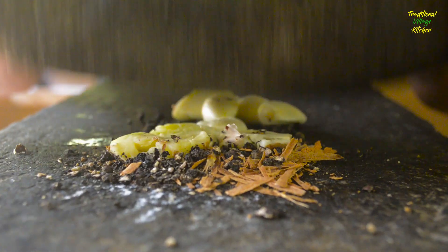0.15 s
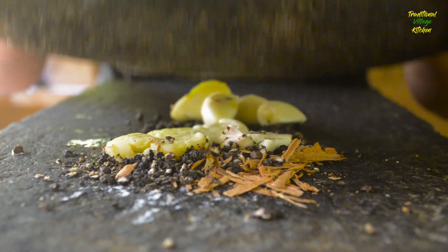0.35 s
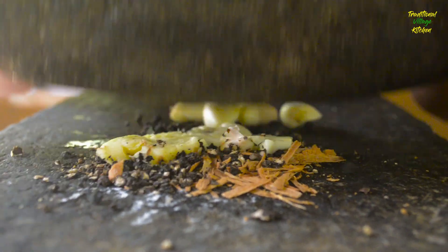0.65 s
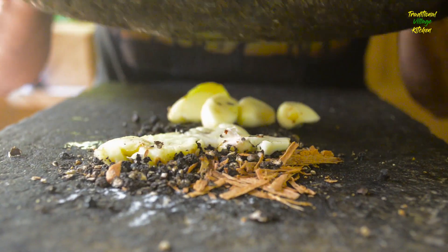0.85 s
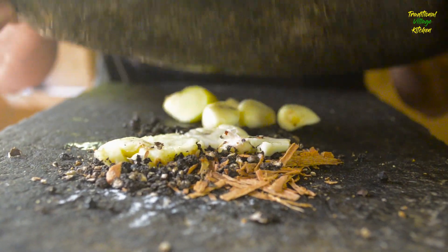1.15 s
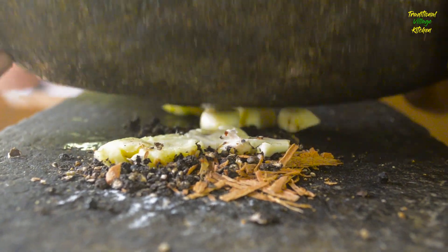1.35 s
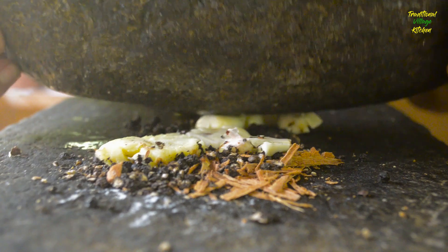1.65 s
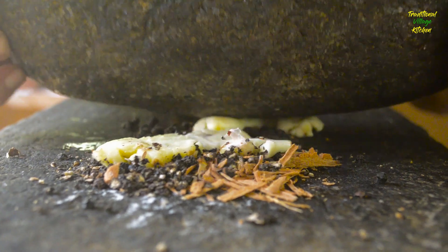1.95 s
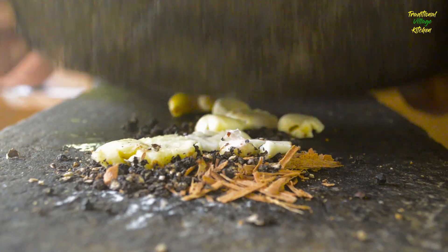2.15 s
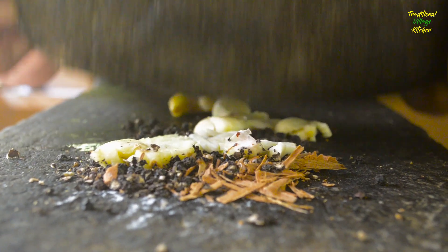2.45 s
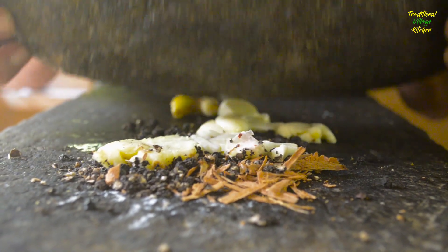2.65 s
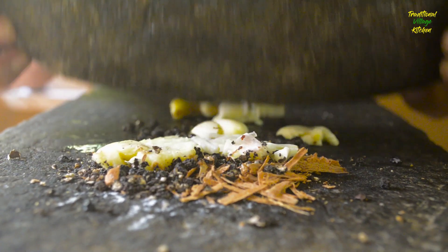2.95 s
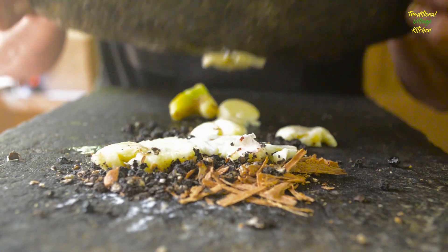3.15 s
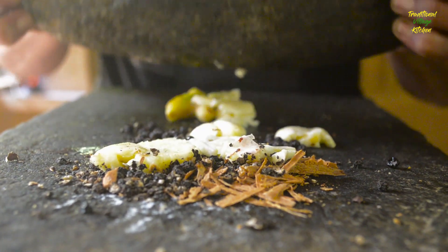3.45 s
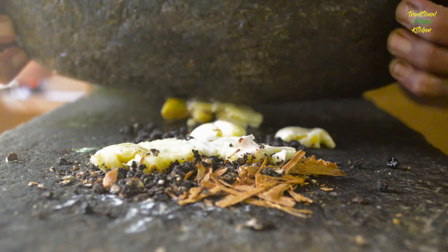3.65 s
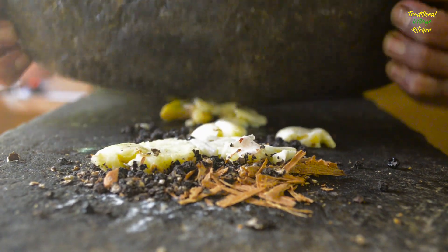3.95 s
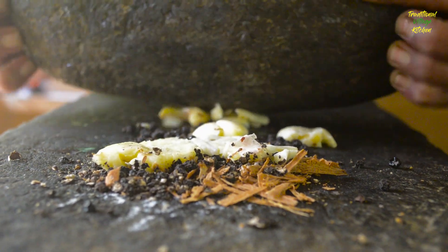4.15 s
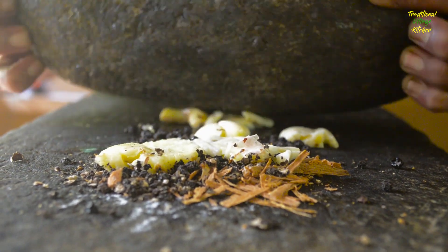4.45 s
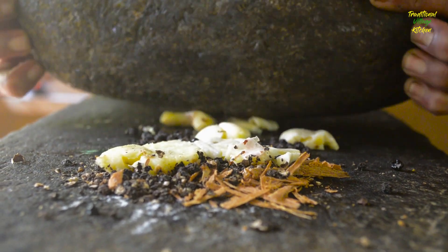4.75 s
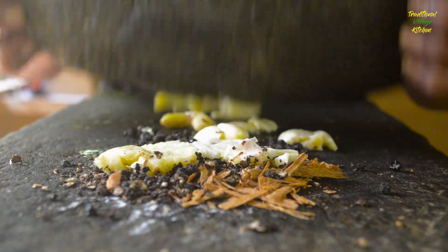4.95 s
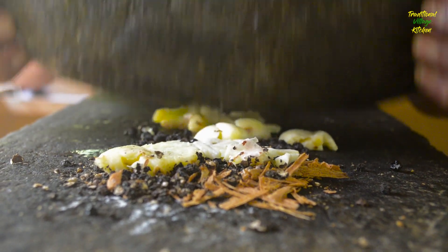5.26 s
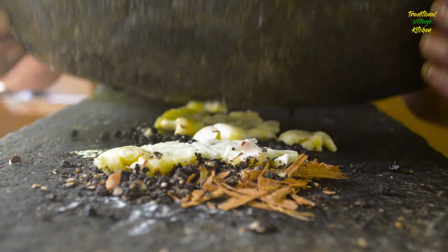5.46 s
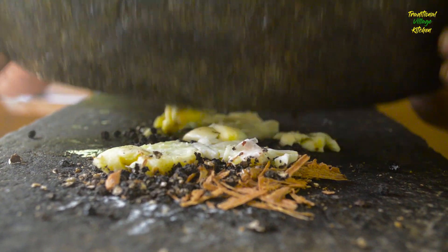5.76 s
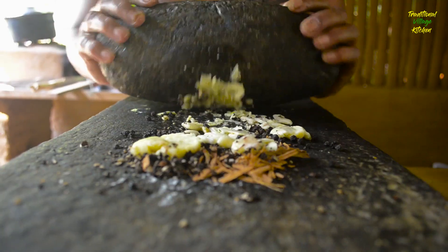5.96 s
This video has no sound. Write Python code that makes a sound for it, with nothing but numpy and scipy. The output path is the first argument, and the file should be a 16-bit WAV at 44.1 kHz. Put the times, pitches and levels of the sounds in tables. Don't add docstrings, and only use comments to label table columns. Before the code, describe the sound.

Very close up, a heavy stone roller pounds garlic and whole spices on a stone slab, roughly three blows a second. Each blow brings a gritty crunch, sharp dry snaps and a low, woody-deep thud from slab and floor, with a short hut echo. Quiet outdoor hush lies behind. Pounding stops shortly before the end, leaving a faint rumble and rustle.

```python
import sys
import numpy as np
from scipy import signal
from scipy.fft import rfft, irfft
from scipy.io import wavfile
from scipy.ndimage import uniform_filter1d

SR = 44100
rng = np.random.default_rng(int(sys.argv[2]) if len(sys.argv) > 2 else 0)


def transcribe(signal):
    frames = np.atleast_2d(signal).T
    limited = np.clip(frames, -1, 1)
    pcm = np.round(limited * 32767).astype(np.int16)
    wavfile.write(sys.argv[1], SR, pcm)


def volts_from_decibels(level):
    exponent = np.asarray(level, float) / 20
    return 10 ** exponent


N = 269010
CUT_S = 5.859
TAP_S = 5.7932

# freq_hz, level_db
HUSH_SPECTRUM = [(60, -42.5), (100, 13), (200, 1), (400, -1), (870, -1), (1760, -5.5), (2400, -9.5),
                 (3200, -14.5), (4200, -21.5), (5400, -25.5), (8000, -28), (11800, -32), (12600, -47.5),
                 (16000, -59)]
# time_s, pitch_hz, level_db
DRONE = [
    (0, 676.5, -63.5),
    (.3, 650, -66),
    (.55, 620, -64),
    (.9, 540, -74),
    (1.2, 498, -76),
]
INSECT_HZ = [7600, 7950, 8150]
# start_s, end_s, pitch_hz, level_db
FAR_TONES = [
    (2.6, 2.8, 1300, -76),
    (2.95, 3.26, 1297, -73),
    (3.07, 3.24, 1940, -68),
    (2.98, 3.2, 2240, -78),
    (.85, 1.0, 1530, -77),
]
# pitch_hz, level_db, t60_s
TAP_MODES = [(1047, -34.5, 0.018), (1824, -31.5, 0.013), (2028, -27.5, 0.012), (2330, -63, .015),
             (3020, -43, 0.012)]
# pitch_hz, level_db, t60_s
TICK_MODES = [(1421, -44, .075), (3284, -56, .04), (2998, -64, .04)]
# freq_hz, level_db
RUMBLE_SPECTRUM = [(18, -38), (30, -21), (59, -1.5), (209, -2.5), (244, -29), (291, -9), (500, -29),
                   (650, -54), (1100, -120)]
# freq_hz, level_db
RUSTLE_SPECTRUM = [(240, -30), (400, -3.5), (1070, -10), (1370, -6), (1800, -11), (2000, -6), (4010, -12.5),
                   (15000, -35)]
# freq_hz, level_db
ECHO_SPECTRUM = [(300, -11), (700, 7.5), (1500, -4), (3000, -4.5), (6000, -5.5), (10000, 4.5), (16000, 1)]
# freq_hz, t60_s
HUT_DECAY = [(600, 0.13), (1600, 0.25), (4000, 0.2), (11000, 0.17)]
# time_s, peak_db, spray_above_8khz_db, fall_s, echo_db
CRUSHES = [(0.2496, -13.5, -36, 0.0058, -7), (0.5772, -8, -27, 0.0043, -8.5),
           (1.034, -25.5, -20, 0.010, -9.5), (1.3573, -23.5, -22, 0.0031, -9.5),
           (1.6737, -14, -28, 0.0036, -7.5), (1.9645, -6, -28.5, 0.003, -9),
           (2.2472, -12.5, -26, 0.0051, -9.5), (2.5427, -14, -37, 0.0038, -8),
           (2.8304, -9, -36, 0.0033, -8.5), (3.282, -22.5, -9, 0.0094, -6.5),
           (3.612, -20, -46, 0.0093, -5.5), (3.9133, -9.5, -18.5, 0.0078, -9.5),
           (4.2058, -11, -21, 0.0035, -10), (4.4832, -7, -21.5, 0.0024, -10),
           (4.765, -11, -18, 0.0075, -9.5), (5.048, -9, -28, 0.0071, -10.5),
           (5.3449, -13.5, -36, 0.0033, -11), (5.6412, -22, -28, 0.0098, -5)]
# freq_hz, level_db
SNAP_SPECTRUM = [(290, -29), (500, -23.5), (649, -10), (1280, -4.5), (3200, -2), (4030, -7), (5550, -12.5),
                 (8330, -23.5), (13300, -30.5), (14900, -34.5), (16000, -39)]
# time_s, level_db, ring_hz, spit_above_6khz_db
SNAPS = [(0.2495, -23, 4200, -18), (0.5781, -24, 2153, -5), (1.0348, -23, 1320, -41),
         (1.0409, -25.5, 2670, -29), (1.36, -17.5, 1555, -25.5), (1.3633, -20, 2400, -50),
         (1.6742, -17, 2620, -42), (1.6772, -18, 1450, -20), (1.6784, -19, 2900, -54),
         (1.9631, -16.5, 2420, -31.5), (1.965, -21, 1400, -25), (2.2475, -16, 1490, -19),
         (2.545, -28, 2430, -5), (2.8325, -18.5, 4040, -8), (3.2832, -29.5, 2450, -15),
         (3.2855, -30, 935, -36), (3.612, -34, 2800, -6), (3.6165, -32.5, 1550, -34),
         (3.9138, -14, 1730, -16), (3.9188, -20.5, 1520, 1), (4.2054, -31, 2750, -21),
         (4.207, -19.5, 2410, -17), (4.4852, -14, 3400, -18.5), (4.4874, -21, 3700, -17),
         (4.7669, -19.5, 1950, -7), (4.7688, -19.5, 3280, -16), (5.0488, -21.5, 1930, -16),
         (5.0504, -26, 1400, -18), (5.3456, -18, 2730, -13), (5.6405, -28, 1770, -14)]
# time_s, level_db, ring_hz, spit_db
STRAY_SNAPS = [
    (1.667, -41, 1900, -25),
    (2.377, -66, 10500, -8),
    (5.718, -58, 4500, -15),
    (5.729, -56, 4000, -15),
    (5.9106, -68, 2566, -26),
]
# lag_s, scatter_s, level_db, spit_db
CRUMBS = [
    (-.0105, .0015, -52, -18),
    (-.0045, .0012, -41, -27),
    (.0062, .0012, -35, -17),
    (.011, .002, -39.5, -18.5),
    (0.019, .006, -50.5, -19),
]
# low_hz, high_hz
CRUMB_RANGE_HZ = (1300, 3500)
# time_s, force_db, contact_ms, side_lag_ms, side_db
BLOWS = [(0.2564, -24.5, 2.84, -4, -34), (0.5804, -21.5, 0.75, -8.5, -24), (1.042, -19.5, 9.5, 12.5, -41),
         (1.3633, -31, 3.5, 6, -38.5), (1.6766, -34.5, 1.7, 5, -40.5), (1.9694, -27.5, 7.3, 15, -34),
         (2.2513, -30.5, 2.1, 18, -33.5), (2.5463, -22.5, 0.75, -7.5, -33),
         (2.8352, -25.5, 0.65, 15, -37.5), (3.298, -35, 3.6, -4.5, -44), (3.6202, -31.5, 4.6, -5, -33),
         (3.921, -27.5, 3.4, -4.5, -47.5), (4.211, -27.5, 1.75, -3.5, -35), (4.4889, -27.5, 2.08, 18, -40),
         (4.7707, -26.5, 0.76, -2, -35.5), (5.0521, -22, 0.6, -7.5, -25), (5.353, -28, 2.83, -4.5, -49),
         (5.6524, -26.5, 3.25, -4.5, -43)]
# time_s, force_db, contact_ms
EARLIER_BLOW = (-0.046, -37.5, 2.8)
# force_db, contact_ms
TAP_PUSH = (-69, .4)
# pitch_hz, level_db, t60_s
BODY_MODES = [(55.2, -9.2, 0.42), (63.5, 0.0, 0.556), (70.6, 0.5, 0.19), (82.4, -8.2, 0.14),
              (100.1, -2.8, 0.264), (116.5, -2.6, 0.1), (126.2, -1.5, 0.219), (141.9, 0.7, 0.13),
              (164.7, -6.3, 0.273), (179.1, 3.1, 0.141), (200.8, -13.4, 0.24), (230.9, 0.7, 0.173),
              (250.5, -3.0, 0.165), (294.2, -5.5, 0.219), (320.9, -0.4, 0.05), (353.7, -7.8, 0.133),
              (389.4, 3.9, 0.096), (427.8, -6.3, 0.165), (451.1, -2.7, 0.156), (475.2, -4.0, 0.127),
              (556.9, -6.6, 0.075), (604.8, -10.7, 0.1),
              (631, -9, .2), (770, -16, .15), (850, -18, .15)]
MODE_SIGNS = [1] * 13 + [-1, 1, -1, -1, 1, -1, -1, 1, 1, -1, 1, -1]


def evened(x):
    return x / np.sqrt(np.mean(x ** 2) + 1e-30)


def read(points, hz):
    f, value = np.transpose(points)
    return np.interp(np.log(hz + 1), np.log(f + 1), value)


def curve(rows, column=1):
    rows = np.array(rows)
    return np.interp(np.arange(N) / SR, rows[:, 0], rows[:, column])


def add(mix, start_s, sound):
    part = mix[round(start_s * SR):][:len(sound)]
    part += sound[:len(part)]


def causal(points, size=1024):
    level_db = np.maximum(read(points, abs(np.fft.fftfreq(4 * size, 1 / SR))), -100)
    log_gain = np.log(volts_from_decibels(level_db))
    taps = np.fft.ifft(np.exp(np.conj(signal.hilbert(log_gain)))).real[:size]
    return taps / np.linalg.norm(taps)


def noise(points, patchy_db):
    a, b, patches = rng.standard_normal((N // 256 + 5, 513, 3)).T
    patches = uniform_filter1d(patches, size=10, axis=0)
    patches = evened(uniform_filter1d(patches, size=14, axis=1))
    colour_db = read(points, np.fft.rfftfreq(1024, 1 / SR))[:, None]
    z = (a + 1j * b) * volts_from_decibels(colour_db + patchy_db * patches)
    return evened(signal.istft(z, nperseg=1024, noverlap=768)[1][:N])


def fuzzy(hz, width_hz):
    r = np.exp(-np.pi * width_hz / SR)
    z = rng.standard_normal(N) + 1j * rng.standard_normal(N)
    slow = signal.lfilter([1], [1, -2 * r, r * r], z)
    phase = 2 * np.pi * np.cumsum(hz * np.ones(N)) / SR
    return evened((slow * np.exp(1j * phase)).real)


def rings(modes, t):
    return np.array([volts_from_decibels(db - 60 * t / t60) * np.sin(2 * np.pi * hz * t) for hz, db, t60, *_ in modes])


def yard():
    t = np.arange(N) / SR
    out = volts_from_decibels(-61) * noise(HUSH_SPECTRUM, patchy_db=.7)
    out += volts_from_decibels(curve(DRONE, 2)) * fuzzy(curve(DRONE), width_hz=90) * (t < DRONE[-1][0])
    insect = evened(sum(fuzzy(hz, width_hz=210) for hz in INSECT_HZ))
    hold_s, end_s, fade_db_per_s = .045, 0.19, 75
    out += volts_from_decibels(-73 - fade_db_per_s * np.maximum(t - hold_s, 0)) * insect * (t < end_s)
    for start_s, stop_s, hz, db in FAR_TONES:
        swell = np.sin(np.pi * np.clip((t - start_s) / (stop_s - start_s), 0, 1)) ** .5
        out += volts_from_decibels(db) * swell * fuzzy(hz, width_hz=22)
    tap_t, tick_t, tick_s = t[:2000], t[:5000], 1.268
    add(out, TAP_S, rings(TAP_MODES, tap_t).sum(0) * (1 - np.exp(-tap_t / 0.00061)))
    add(out, tick_s, rings(TICK_MODES, tick_t).sum(0) * (1 - np.exp(-tick_t / 0.002)))
    return out


def next_angle():
    t = np.arange(N) / SR
    full_s, bump_s = 6.088, 5.947
    to_go_s = np.maximum(full_s - t, 0)
    bump = volts_from_decibels(-73 - 140 * abs(t - bump_s)) * np.clip((t - bump_s) / .008 + 1, 0, 1)
    low = volts_from_decibels(-91) + volts_from_decibels(-58.5 - 211.5 * to_go_s) + bump
    high = volts_from_decibels(-93.5) + volts_from_decibels(-65.5 - 307 * to_go_s)
    return low * noise(RUMBLE_SPECTRUM, patchy_db=4.5) + high * noise(RUSTLE_SPECTRUM, patchy_db=0.5)


def hut(x):
    out, size = np.zeros(N), SR // 3
    grain_db = 1.2
    high = np.clip(np.fft.rfftfreq(2048, 1 / SR) / 2000 - 1.5, 0, 1)
    for s, *_, echo_db in CRUSHES:
        taps = rng.choice([-1., 1.], size) * (rng.random(size) < .15) * (np.arange(size) > 200)
        hz, t, z = signal.stft(taps, SR, nperseg=128)
        z = z * volts_from_decibels(grain_db * rng.standard_normal(len(t)))
        z = z * volts_from_decibels(read(ECHO_SPECTRUM, hz)[:, None] - 60 * t / read(HUT_DECAY, hz)[:, None])
        tail = signal.istft(z, SR, nperseg=128)[1]
        power = abs(rfft(x[round((s - .015) * SR):][:2000], 2048)) ** 2
        fine, coarse = uniform_filter1d(power, size=45), uniform_filter1d(power, size=90)
        gain = np.sqrt(abs((1 - high) * fine + high * coarse))
        colour = np.fft.fftshift(irfft(gain))[768:1280]
        echo = signal.fftconvolve(colour, tail / np.linalg.norm(tail))
        add(out, s - 256 / SR, volts_from_decibels(echo_db) * echo)
    return out


def crush():
    out, t = np.zeros(N), np.arange(-.015 * SR, .06 * SR) / SR
    spray = signal.butter(2, 8500, "high", fs=SR)
    for s, db, spray_db, fall_s, _ in CRUSHES:
        grit = rng.standard_normal(len(t)) * volts_from_decibels(2.3 * rng.exponential(1, len(t)).clip(0, 5))
        swell = np.where(t < .001, np.exp(t / 0.0018), np.exp(-t / max(fall_s, .001)))
        body = evened(signal.oaconvolve(grit, causal(SNAP_SPECTRUM))[:len(t)])
        body += volts_from_decibels(spray_db) * evened(signal.lfilter(*spray, grit))
        add(out, s - .015, volts_from_decibels(db - 18) * swell * body)
    return out


def all_snaps():
    loud, rows = np.array(SNAPS), list(SNAPS)
    low_hz, high_hz = CRUMB_RANGE_HZ
    follow, usual_db = 0.66, -24
    for (s, *_), chance in zip(CRUSHES, rng.random((len(CRUSHES), len(CRUMBS), 2))):
        near = loud[abs(loud[:, 0] - s) < .02]
        top_s, top_db = near[near[:, 1].argmax(), :2]
        for (lag_s, scatter_s, db, spit_db), (a, b) in zip(CRUMBS, chance):
            crumb_s = top_s + lag_s + scatter_s * (2 * a - 1)
            hz = low_hz * (high_hz / low_hz) ** b
            rows.append((crumb_s, db + follow * (top_db - usual_db), hz, spit_db))
    return rows


def snaps(rows):
    out, t = np.zeros(N), np.arange(160) / SR
    ring_t = np.arange(400) / SR
    thin = signal.butter(2, 850, "high", fs=SR)
    bright = signal.butter(2, [6500, 14000], "band", fs=SR)
    for (s, db, hz, spit_db), z in zip(rows, rng.standard_normal((len(rows), 2, len(t)))):
        breaks = z[0] * abs(z[1]) * np.exp(-abs(t - .0004) / .0006)
        breaks[18] += 8
        ring = rings([(hz, 0, .0036)], ring_t)[0] * (1 - np.exp(-ring_t / .0003))
        shell = np.convolve(breaks, ring)
        broad = np.convolve(breaks, causal(SNAP_SPECTRUM, size=400))
        spit = np.pad(z[1] * np.exp(-t / .0014) + .15 * breaks, (0, 399))
        spit = signal.lfilter(*bright, spit)
        snap = evened(shell) + volts_from_decibels(spit_db / 3 + 5.5) * evened(broad) + volts_from_decibels(spit_db) * evened(spit)
        snap = signal.lfilter(*thin, snap)
        add(out, s - .0004, volts_from_decibels(db + 1) * snap / abs(snap).max())
    return out


def pushes():
    rows = [EARLIER_BLOW, (TAP_S, *TAP_PUSH)]
    for s, db, contact_ms, lag_ms, side_db in BLOWS:
        if lag_ms < 0:
            side_ms = -lag_ms * (0.93 if -lag_ms > 7 else 0.29)
        else:
            side_ms = .6 + 0.4 * contact_ms
        rows += [(s, db, contact_ms), (s + lag_ms / 1000, side_db, max(side_ms, .2))]
    return rows


def thud(force):
    t = np.arange(SR * 3 // 4) / SR
    response = -np.array(MODE_SIGNS) @ rings(BODY_MODES, t)
    response[0] -= 71
    band = signal.butter(2, [95, 650], "band", fs=SR)
    murmur = evened(signal.lfilter(*band, rng.standard_normal(len(t))))
    response += volts_from_decibels(-10 - 60 * t / 0.37) * murmur * (1 - np.exp(-(t / 0.013) ** 2))
    return signal.fftconvolve(force, response)[:len(force)]


def roller(snapped):
    lead = 4410
    force, ms = np.zeros(N + lead), np.arange(-1300, 1000) / SR * 1000
    for s, db, contact_ms in pushes():
        push = np.exp(-(ms / np.where(ms < 0, contact_ms, .65 * contact_ms)) ** 2)
        add(force, s + (lead - 1300) / SR, volts_from_decibels(db) * push / push.sum())
    for s, db, *_ in snapped:
        add(force, s + lead / SR, volts_from_decibels(db - 30.5) * np.hanning(60) / 30)
    return thud(force)[lead:]


def scene():
    after = np.clip((np.arange(N) / SR - CUT_S) / 0.0018, 0, 1)
    rows = all_snaps()
    cracks, grit = snaps(rows + STRAY_SNAPS), crush()
    first = roller(rows) + grit + hut(cracks + grit) + yard()
    first = signal.sosfilt(signal.butter(4, 61.4, "high", fs=SR, output="sos"), first)
    return ((1 - after) * first + after * next_angle() + cracks)[None]


def low_pass(x):
    return signal.sosfilt(signal.butter(12, 16510, fs=SR, output="sos"), x)


def record(dry):
    mix = signal.sosfiltfilt(signal.butter(3, 44, "high", fs=SR, output="sos"), dry)
    mix = signal.sosfiltfilt(signal.butter(12, 15700, fs=SR, output="sos"), mix)
    mix = mix + .00062 * np.clip((CUT_S - np.arange(N) / SR) / .003, 0, 1)
    return low_pass(mix)


dry = scene()
out = record(dry)
transcribe(out)
```